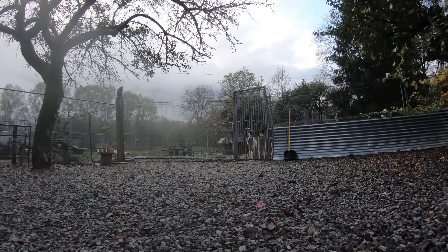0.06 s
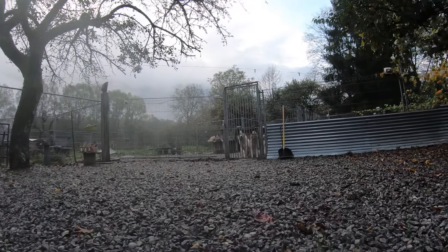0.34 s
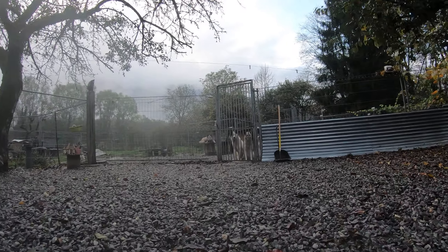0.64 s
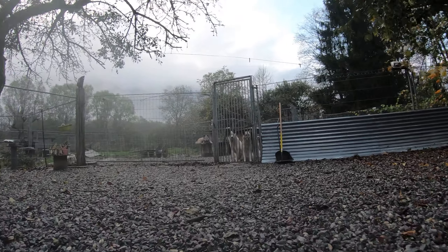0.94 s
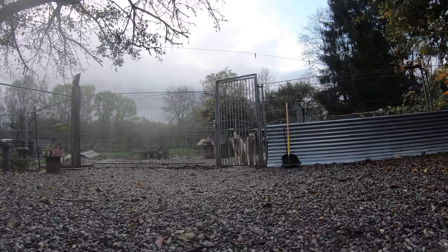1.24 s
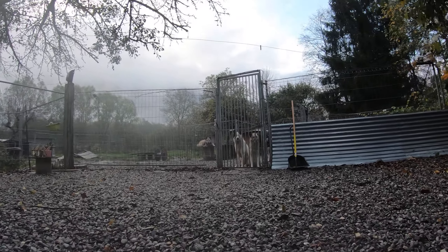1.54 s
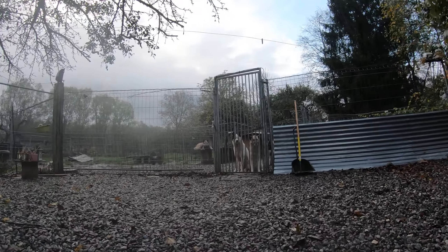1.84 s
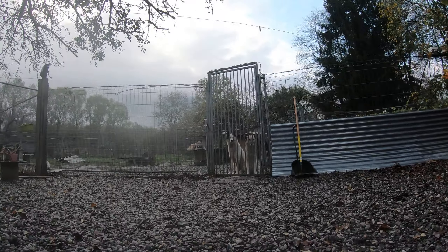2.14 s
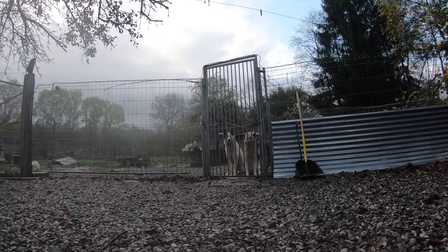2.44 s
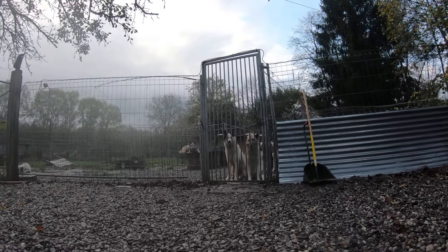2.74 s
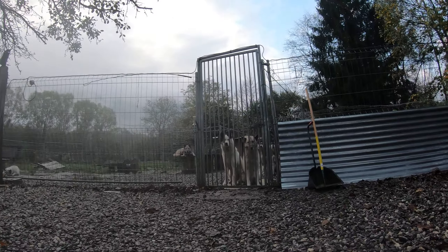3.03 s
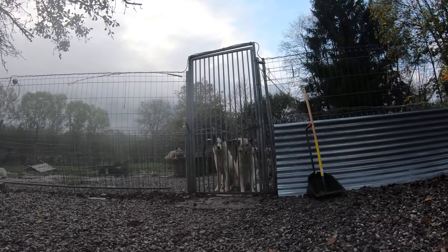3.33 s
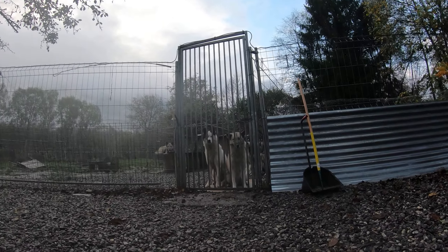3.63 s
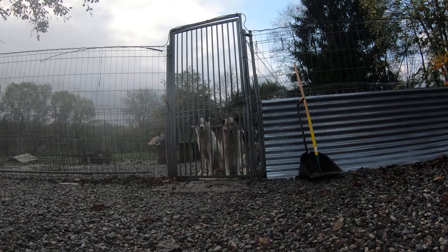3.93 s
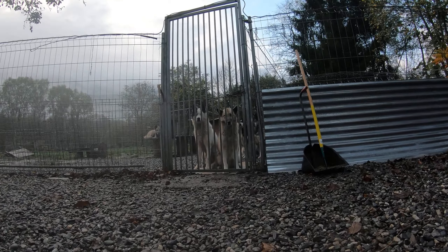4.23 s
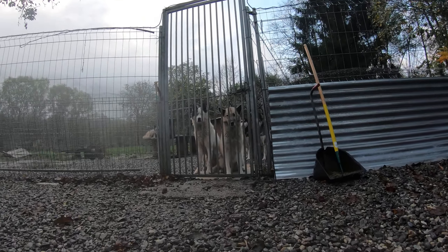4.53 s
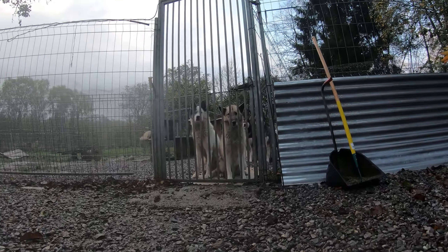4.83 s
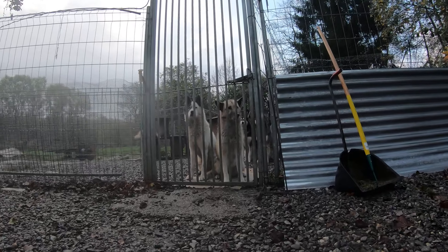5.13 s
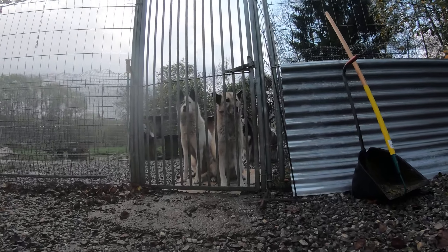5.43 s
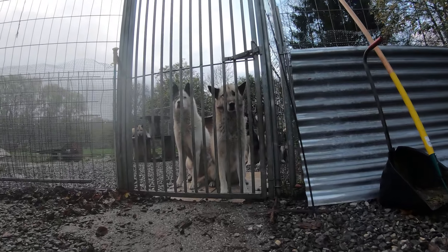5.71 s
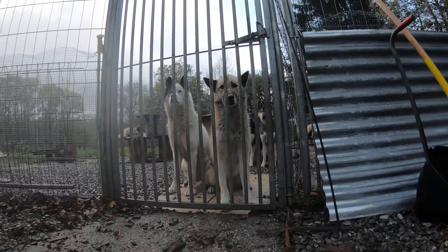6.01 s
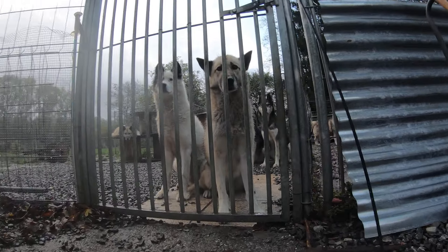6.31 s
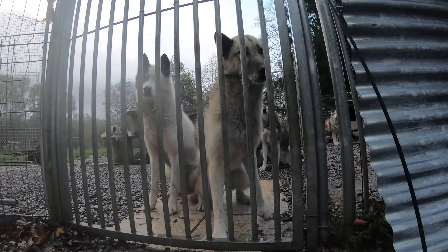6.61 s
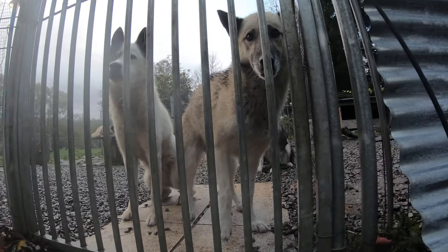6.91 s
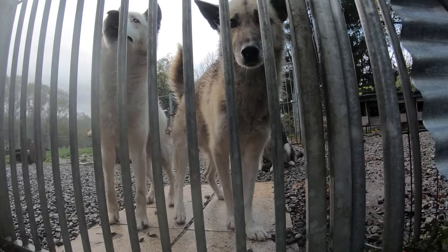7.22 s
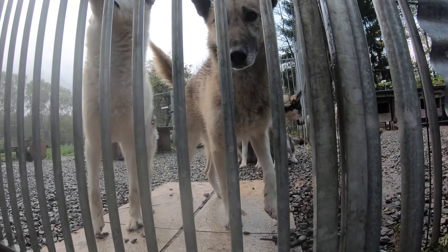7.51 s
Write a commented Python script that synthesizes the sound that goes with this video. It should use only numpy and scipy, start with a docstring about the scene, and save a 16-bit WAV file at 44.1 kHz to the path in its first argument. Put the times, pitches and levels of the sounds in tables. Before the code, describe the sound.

Faint, very high dog whines and a few gusts on a carried microphone open an outdoor walk over gravel. The footsteps crunch close by at an easy pace, heaviest at first, with stones clicking and one sharper click partway through. Toward the end the steps soften, and a quiet dog squeak, a short hollow tap and more brief whines follow, all over a soft hiss and low drone.

```python
"""Footsteps on gravel, dogs at a gate

Someone crosses a yard toward dogs that wait behind a gate. Heel and sole press, hold and release:
friction makes stones slip and collide over a dull thud, and loose pebbles click after them.
The dogs give thin, nearly pure whines and a rough squeak; one hollow tap sounds near the end.
Beneath lie a soft outdoor hiss, a low drone and the rumble of wind on a carried microphone."""
import sys
import numpy as np
from scipy import signal
from scipy.fft import rfft, irfft
from scipy.io import wavfile
from scipy.ndimage import uniform_filter1d

SR = 44100
rng = np.random.default_rng(int(sys.argv[2]) if len(sys.argv) > 2 else 0)


def to_wav(sig):
    """Store sig (one row per channel, or 1-D mono) as 16-bit WAV at the path in sys.argv[1].

    Samples outside -1..1 are clipped; the rate is SR.
    """
    pcm = np.clip(np.atleast_2d(sig), -1, 1) * 32767
    pcm = np.round(pcm).astype(np.int16)
    wavfile.write(sys.argv[1], SR, pcm.T)  # frames by channels


N = 337806

# Levels are relative: each source adds its own gain.
# Each row: time in seconds, then hiss, rustle and drone levels in dB.
BACKGROUND_LEVELS = [(0, -49, -71, -48), (.75, -49, -86, -49), (1.45, -49, -55.5, -48.5),
                     (1.82, -56.5, -61, -50.5), (2.2, -51.5, -56, -48), (2.6, -51.5, -45, -50.5),
                     (3.25, -58.5, -64, -54.5), (3.65, -56, -58, -55.5), (4.4, -56, -57, -52.5),
                     (5.3, -54.5, -51.5, -54), (5.98, -56, -58, -54.5), (6.7, -54, -54.5, -55),
                     (7.15, -54, -50, -51), (7.66, -55, -55, -54)]
# Wind on the microphone, strongest at the outset. Each row: time in seconds, level in dB.
WIND_LEVELS = [(0, -49.5), (.35, -40.5), (.55, -48.5), (.72, -41), (.82, -50.5), (1.3, -58), (2.3, -56),
               (2.7, -65), (3.3, -55.5), (4.15, -54.5), (7.66, -58.5)]
# Spectra of the air, the rumble and the stones. Each row: frequency in Hz, gain in dB.
HISS_SPECTRUM = [(300, 2), (500, -9.5), (750, -6), (950, -10.5), (1400, -7.5), (3200, -11.5), (5000, -17),
                 (8200, -20), (10400, -41.5), (11200, -56.5), (13800, -57), (14800, -70), (16000, -90)]
RUMBLE_SPECTRUM = [(12, 7), (20, -21), (59, 0.5), (76, -4), (114, -13), (168, -7.5), (216, -9), (291, -15),
                   (313, -13), (380, -20.5), (536, -26.5), (586, -15), (700, -12.5), (910, -52),
                   (1540, -120)]
GRAVEL_SPECTRUM = [(60, -20), (110, 1), (190, 1), (300, -3.5), (500, -5.5), (750, -10), (1300, -8.5),
                   (2100, -15), (3300, -11), (5300, -18.5), (7600, -12), (10400, -25), (11300, -33.5),
                   (13800, -36.5), (15800, -55)]
# Each row: start and length in seconds, pitch in Hz, glide in Hz per second, level in dB,
# octave in dB re the fundamental, waver as a fraction of the pitch.
DOG_WHINES = [(.022, 0.072, 4200, 600, -51.5, -36, 0.0052), (0.098, 0.048, 4140, -900, -51, -27, 0.014),
              (0.212, .06, 4150, -900, -51, -41, .014), (2.125, 0.12, 4380, 500, -68, -25, .009),
              (6.763, 0.066, 3460, -3000, -56, 1, 0.037), (7.435, 0.04, 3130, -500, -54, -13, 0.03),
              (7.477, 0.023, 3120, -500, -48.5, -3, 0.054)]
# The loudest pebbles. Each row: start in seconds, level in dB, ring in Hz,
# rattle time constant in seconds, ring in dB re the crack.
PEBBLE_IMPACTS = [(0.107, -22, 524, 0.0031, 29), (0.149, -27, 1560, 0.0023, 20),
                  (0.58, -31, 900, 0.003, 15), (0.665, -31.5, 3000, 0.005, 11),
                  (0.797, -16, 640, 0.0087, 31), (0.822, -20, 576, 0.0028, 10),
                  (1.048, -12, 956, 0.0037, 19), (1.09, -16, 1440, 0.0012, 28),
                  (1.253, -19.5, 514, 0.0065, 37), (1.581, -18, 3640, 0.0038, 8),
                  (1.938, -24.5, 3630, 0.0046, -20), (2.165, -26.5, 1610, 0.0043, 14),
                  (2.193, -30, 2120, 0.0089, 8), (2.263, -28, 6900, 0.0024, 16),
                  (2.403, -15.5, 480, 0.0048, 21), (2.473, -18.5, 540, 0.0075, -23),
                  (2.729, -29.5, 3420, 0.0027, -7), (2.775, -23.5, 3500, 0.0041, 3),
                  (2.971, -7, 6900, 0.0052, 26), (3.094, -26, 7470, 0.0023, 0),
                  (3.774, -30, 6000, 0.0036, 14), (3.823, -24, 4270, 0.0016, 7),
                  (4.675, -21, 1500, 0.0021, 10), (4.712, -14, 7400, 0.0024, 16),
                  (4.754, -14, 2840, 0.003, 6), (4.8, -15.5, 1590, 0.0055, 5),
                  (4.84, -15.5, 1410, 0.0071, 6), (4.851, -19, 1700, 0.0024, 3),
                  (4.923, -22, 1700, 0.0014, 13), (4.946, -22, 2780, 0.0022, 2),
                  (4.966, -21, 1760, 0.0013, 13), (4.995, -23.5, 6860, 0.0039, -5),
                  (5.01, -21.5, 6880, 0.0037, -2), (5.021, -24.5, 2510, 0.0015, 7),
                  (5.053, -29, 5670, 0.0018, 3), (5.108, -28.5, 6470, 0.0014, 6),
                  (5.073, -32.5, 7400, 0.0016, 11), (5.139, -16.5, 6600, 0.0042, 8),
                  (5.452, -35, 8000, 0.002, 8), (5.55, -20.5, 7100, 0.002, -17),
                  (5.611, -14.5, 1660, 0.004, 18), (5.803, -25.5, 3930, 0.004, 8),
                  (5.827, -28, 4180, 0.0076, 9), (6.038, -23, 4050, 0.0014, -1),
                  (6.175, -21, 2280, 0.0045, 13), (6.252, -8.5, 1320, 0.0022, 2),
                  (6.301, -11, 3750, 0.0082, -33), (6.401, -17.5, 3290, 0.0039, -31),
                  (6.451, -23.5, 9200, 0.0011, 7), (6.816, -28, 6400, 0.0029, -28),
                  (7.005, -19, 3660, 0.0046, 18), (7.121, -26, 1740, 0.0017, 3),
                  (7.146, -21, 1070, 0.0071, -3), (7.206, -19, 6840, 0.012, 20),
                  (7.235, -14, 7600, 0.0016, 17), (7.245, -23.5, 7780, 0.0061, 2),
                  (7.27, -21.5, 7700, 0.0044, 2), (7.316, -21, 8550, 0.0046, 15),
                  (7.43, -25.5, 7200, 0.0019, 18), (7.625, -30.5, 1180, 0.0016, 6)]
# A heel or sole loads the gravel. Each row: start, rise and hold in seconds, fade in dB per second,
# crunch level in dB, then offsets in dB for coarse stones, fine grit and weight on the ground.
FOOT_PRESSES = [(0.243, .02, 0.012, 291, -41.5, 7, -22, 7), (0.271, 0.014, .006, 448, -26.5, -9, -17, -5),
                (0.317, 0.018, 0.04, 288, -23, -1.5, -20.5, -0.5),
                (0.438, 0.02, 0.017, 200, -44, -3, -19, 5), (0.842, .03, .02, 200, -47.5, 3, -32, 9.5),
                (.895, 0.0058, 0.033, 302, -24.5, -4, -18, -5),
                (0.927, 0.0075, 0.042, 227, -23.5, -0.5, -22, 3),
                (1.058, 0.016, 0.018, 260, -40.5, -0.5, -18, 4),
                (1.169, .02, 0.025, 152, -48.5, 1.5, -15, 5),
                (1.485, 0.018, 0.044, 148, -49.5, 5.5, -7.5, 9.5),
                (1.567, 0.041, 0.05, 220, -29, -2, -8, 2), (2.257, 0.0074, 0.039, 300, -33, -1, 6.5, -1),
                (2.282, 0.0095, 0.024, 223.5, -29.5, 2, 1, 2.5),
                (2.398, 0.0059, 0.0051, 332, -39.5, 4.5, 3.5, 9),
                (2.868, 0.0081, .018, 295, -29.5, -10, 3.5, -8),
                (2.906, .014, 0.054, 188, -27.5, -2, 1, -0.5),
                (3.815, 0.0096, 0.038, 253, -29.5, -7, 0.5, -7),
                (3.919, 0.055, .022, 222, -37, 0.5, -2.5, 1.5),
                (4.7, 0.013, 0.056, 378, -33.5, -12, 0, -11),
                (4.779, 0.019, .15, 232, -40.5, -3.5, -2.5, -6), (4.83, 0.0067, 0.012, 600, -41.5, 4, 5, 6),
                (5.544, 0.03, 0.015, 380, -30, -2, 3, -2),
                (5.627, 0.012, 0.027, 131, -42, -4.5, -3.5, -2.5),
                (6.032, 0.0051, 0.047, 397, -46, -3.5, -0.5, -3),
                (6.11, 0.011, 0.064, 200, -46, -4.5, -1.5, -3),
                (6.201, .01, 0.0093, 355, -33.5, -8.5, 3.5, -9),
                (6.245, 0.0031, 0.061, 420, -33.5, -1, -2.5, -5.5),
                (6.337, 0.018, 0.059, 260, -43.5, -5, -3.5, -1.5),
                (6.887, 0.017, .01, 228, -36.5, 0.5, 2.5, -1),
                (6.993, 0.028, 0.024, 198, -41, 0.5, -5, 0.5), (7.099, .02, .05, 139, -45.5, -5.5, -3, -8),
                (7.59, 0.02, 0.065, 200, -49.5, 2, -5, -9)]
# Each row: start in seconds, level in dB.
SHOE_THUDS = [(0.369, -29), (0.821, -24), (0.957, -10.5), (0.969, -10), (1.251, -35), (2.122, -33),
              (2.344, -19), (2.404, -25)]
# Each row: start and length in seconds, ring in Hz, level in dB.
STONE_GRINDS = [(0.882, 0.061, 2510, -28.5), (0.931, 0.055, 1190, -29.5), (1.59, 0.11, 2240, -40),
                (2.273, 0.083, 2670, -38.5), (4.834, 0.037, 1450, -36), (5.567, 0.054, 1810, -33)]
# Each row: time in seconds, pitch in Hz, level in dB.
SQUEAK_CONTOUR = [(6.772, 7600, -56), (6.79, 7050, -52), (6.81, 6320, -51), (6.845, 6460, -50),
                  (6.87, 7000, -57), (6.885, 6500, -50)]
# The hollow tap: start in seconds, level in dB.
TAP = (7.0834, -19.5)
# Each row: frequency in Hz, level in dB, time to decay by 60 dB in seconds.
TAP_MODES = [(300, -12, .03), (750, -29, 0.011), (1320, 0.5, 0.017), (1700, 0.5, 0.018), (2800, -24, .006),
             (4300, -11, .004), (5550, -10, 0.0048)]
# Stereo width. Each row: frequency in Hz, side gain in dB.
SIDE_SPECTRUM = [(25, -16), (70, -17.5), (200, -23), (500, -16.5), (1000, -12.5), (4000, -15.5), (6000, -9),
                 (8500, -7), (10000, -6), (12000, -5), (15000, -8)]
# The left port is more sensitive in the high treble. Each row: frequency in Hz, left in dB re right.
PORT_BALANCE = [(700, 0), (1500, -1.2), (5000, -1), (6300, -2.6), (7500, -1), (8200, 4.5), (8800, 6.5),
                (10000, 2), (11000, 3), (15000, 3)]
# The image starts narrow and opens. Each row: time in seconds, side gain in dB.
STEREO_OPENING = [(0, -32), (1.2, -24), (1.65, -11), (2.2, -1), (2.8, 0)]


def amp(db):
    """Decibels to amplitude ratio."""
    return 10 ** (np.asarray(db) / 20)


def unit(x):
    """Normalises to rms 1."""
    return x / np.sqrt(np.mean(x ** 2) + 1e-20)


def spectrum_at(points, hz):
    """Interpolates a spectrum on a log-frequency axis."""
    f, db = np.transpose(points)
    return np.interp(np.log(hz + 1), np.log(np.abs(f) + 1), db)


def level_curve(points, column=1):
    """Interpolates a level column over the whole scene."""
    return np.interp(np.arange(N) / SR, *np.transpose(points)[[0, column]])


def add(mix, s, sound):
    """Superposition: mixes a sound in at s seconds."""
    part = mix[..., max(round(s * SR), 0):][..., :sound.shape[-1]]
    part += sound[..., :part.shape[-1]]


def colour(x, points):
    """Minimum-phase filtering shapes the spectrum and keeps attacks sharp."""
    gain_db = np.maximum(spectrum_at(points, abs(np.fft.fftfreq(4096, 1 / SR))), -100)
    response = np.exp(np.conj(signal.hilbert(np.log(amp(gain_db)))))
    taps = np.fft.ifft(response).real[:2048]
    return signal.oaconvolve(x, np.array(taps, ndmin=x.ndim), axes=-1)[..., :x.shape[-1]]


def band(x, lo_hz, hi_hz, order=4):
    """Band-pass filter."""
    return signal.sosfilt(signal.butter(order, [lo_hz, hi_hz], "band", fs=SR, output="sos"), x)


def drift(size, per_s):
    """Random modulation of rms 1, with per_s turning points a second."""
    knots = rng.standard_normal(4096)
    return unit(np.interp(np.arange(size) * per_s / SR, np.arange(len(knots)), knots))


def steady(x):
    """Division by the running rms evens the level and leaves the grain."""
    power = x[0] ** 2
    return x / np.sqrt(np.abs(uniform_filter1d(power, 1100)) + 1e-4 * power.mean())


def stone_contacts(per_s, spread_db, clump_db, ring_db, sizes=36, decay_cycles=19):
    """Shot noise: each random collision gives a dry crack and the damped ring of one stone size."""
    size = len(per_s)
    t = np.arange(400) / SR
    force = amp(spread_db * np.minimum(rng.exponential(1, size), 4.5) + clump_db * drift(size, 220))
    hits = force * rng.choice([-1, 1], size) * (rng.random(size) < per_s / SR)
    stone = rng.integers(0, sizes, size)
    out = np.zeros((2, size))
    for k, hz in enumerate(np.linspace(700, 15500, sizes)):
        hz += rng.uniform(-250, 250)
        decay = np.exp(-t * (hz / decay_cycles + 330))
        ring = decay * np.sin(2 * np.pi * (hz * t + rng.random((2, 1))))
        crack = rng.standard_normal((2, len(t))) * np.exp(-t / .00021)
        patch_db = rng.uniform(-1, 1.9)  # each patch of gravel has its own mix of sizes
        contact = amp(ring_db + patch_db) * unit(ring) + unit(crack)
        out += signal.oaconvolve((hits * (stone == k))[None], contact, axes=1)[:, :size]
    return out


def diffuse(x, side_db):
    """A diffuse field is wider than a point source, so its side channel is raised."""
    return unit(x) * amp([[0], [side_db]])


def outdoor_hiss():
    """Broadband noise arrives from all around, with a faint rustle of settling gravel."""
    hiss_db, rustle_db = level_curve(BACKGROUND_LEVELS, 1), level_curve(BACKGROUND_LEVELS, 2)
    settling = unit(stone_contacts(np.full(N, 600.), spread_db=3, clump_db=4.5, ring_db=10.5))
    air = colour(rng.standard_normal((2, N)) + .4 * settling, HISS_SPECTRUM)
    air *= amp(1.1 * drift(N, 28))  # the level flutters
    hiss = amp(hiss_db - .5) * diffuse(band(air, 417, 5600), 8)
    rustle = amp(rustle_db - 10.5) * diffuse(band(air, 6590, 14400), 3)
    fizz_gain = np.hypot(amp(hiss_db - 30), amp(rustle_db - 28))
    return hiss + rustle + fizz_gain * diffuse(band(air, 10900, 16000, order=6), 3)


def drone(rumble):
    """Amplitude modulation makes a low band of noise waver."""
    level_db = level_curve(BACKGROUND_LEVELS, 3) + 1.7 * drift(N, 12)
    return amp(level_db) * diffuse(band(rumble, 128, 492), 6)


def buffeting(rumble, gust_db=3.5, jolt_db=-16.5, delay_s=.06, width_s=.038):
    """Wind gusts and the jolt of each press shake the microphone; their powers add."""
    t = np.arange(N) / SR
    gusts = amp(level_curve(WIND_LEVELS) + gust_db * drift(N, 14))
    jolts = sum(amp(db + jolt_db) * np.exp(-((t - s - delay_s) / width_s) ** 2)
                for s, _, _, _, db, *_ in FOOT_PRESSES)
    return np.hypot(gusts, jolts) * diffuse(band(rumble, 11.2, 126, order=3), 6)


def whine(s, length_s, hz, glide_hz_per_s, db, octave_db, waver):
    """A dog's nasal whistle: a fundamental and its second harmonic swell, glide and fade."""
    t = np.arange(0, length_s, 1 / SR)
    pitch = (hz + glide_hz_per_s * (t - length_s / 2)) * (1 + waver * drift(len(t), 450))
    phase = 2 * np.pi * np.cumsum(pitch) / SR
    tone = np.sin(phase) + amp(octave_db) * np.sin(2 * phase)
    swell = np.sin(np.pi * t / length_s) ** .64
    return s, amp(db) * np.sqrt(2) * tone * swell


def pebble(s, db, hz, rattle_s, ring_db):
    """Impact excitation: a crack and a brief rattle drive the stone's resonance."""
    t = np.arange(2600) / SR
    decay = .55 * np.exp(-t / rattle_s) + np.exp(-t / .0004) + .03 * np.exp(-t / .009)
    crack = colour(rng.choice([-1, 1], (2, len(t))) * decay, GRAVEL_SPECTRUM)
    crack = band(crack, .21 * hz + 200, 15500, order=2)
    ring = band(crack, hz / 1.3, hz * 1.3 + 500, order=1)
    return s, amp(db - 25.5) * unit(unit(crack) + amp(ring_db) * unit(ring))


def footfall(s, rise_s, hold_s, fade_db_per_s, level_db, coarse_db, grit_db, weight_db, length_s=.55):
    """Granular friction: the greater the load, the more stones slip; big ones sound low, grit high."""
    t = np.arange(0, length_s, 1 / SR)
    released_s = np.maximum(t - rise_s - hold_s, 0)
    settling = amp(-26.5 - 53.5 * released_s)  # stones keep shifting after the foot stops
    press = np.clip(t / rise_s, .01, 1) * np.hypot(amp(-fade_db_per_s * released_s), settling)
    crunch_db = level_db + 20 * np.log10(press)
    contacts_per_s = 3500 * amp(.62 * (crunch_db + 31.5))
    stones = unit(stone_contacts(contacts_per_s, spread_db=2.7, clump_db=1, ring_db=-2.5))
    stones = colour(stones + .18 * rng.standard_normal(stones.shape), GRAVEL_SPECTRUM)
    lag_db = -4 * np.exp(-t / .09)  # ground and big stones come in after the first grit
    ground = amp(weight_db + lag_db - 1.14) * steady(band(stones, 163, 386, order=2))
    coarse = amp(coarse_db + .5 * lag_db - 2.2) * steady(band(stones, 594, 1920))
    middle = amp(-3.02) * steady(band(stones, 2060, 5110))
    grit = amp(grit_db - .5) * steady(band(stones, 5130, 10900))
    dust = amp(.21 * grit_db - 23.5) * steady(band(stones, 11370, 15200))
    fade_out = np.minimum(10 * (1 - t / length_s), 1)
    return s, amp(crunch_db) * (ground + coarse + middle + grit + dust) * fade_out


def stray_pebbles(per_press=2, mean_flight_s=.17, lo_hz=1500, hi_hz=7000):
    """Rows for kicked pebbles, delayed by their time of flight; gritty ground throws brighter ones."""
    rows = []
    for s, *_, grit_db, _ in FOOT_PRESSES:
        for flight, size, tone in rng.random((per_press, 3)):
            hz = lo_hz * (hi_hz / lo_hz) ** (tone * amp(min(grit_db, 0)))
            rows.append((s + mean_flight_s * (.5 + flight), size - 39.5, hz, .0022, 6))
    return rows


def thud(s, db, hz=245, t60=.018):
    """Heavy damping: packed ground answers the shoe with a few low cycles."""
    t = np.arange(4000) / SR
    push = np.sin(2 * np.pi * hz * t) * amp(-60 * t / t60)
    knock = band(push, 155, 670, order=2)
    return s, amp(db - 1.5) * knock / abs(knock).max()


def grind(s, length_s, hz, db):
    """Stick-slip friction keeps one large stone ringing in a narrow band."""
    size = int(length_s * SR)
    ring = band(rng.standard_normal(size), .9 * hz, 1.1 * hz, order=2)
    return s, amp(db) * unit(ring) * signal.windows.tukey(size, .5)


def squeak(jitter=.0315, detune=.99):
    """A dog's squeak: random frequency modulation roughens two whistles that slide together."""
    s, hz, db = np.transpose(SQUEAK_CONTOUR)
    t = np.arange(s[0], s[-1], 1 / SR)
    pitch = np.interp(t, s, hz)
    phases = [2 * np.pi * np.cumsum(pitch * (1 + jitter * drift(len(t), 910))) / SR for _ in range(2)]
    tone = .99 * np.sin(phases[0]) + .5 * np.sin(detune * phases[1])
    return s[0], amp(np.interp(t, s, db)) * tone * signal.windows.tukey(len(t), .15)


def hollow_tap():
    """Free vibration: a hollow body, struck once, rings in decaying modes."""
    s, level_db = TAP
    t = np.arange(2000) / SR
    ring = sum(amp(db - 60 * t / t60) * np.sin(2 * np.pi * hz * t) for hz, db, t60 in TAP_MODES)
    return s, amp(level_db + .5) * ring


def echoes(x, wet_db=-23, t60=.3, per_s=2000):
    """Scattering from ground, fence and trees adds faint reflections."""
    t = np.arange(SR // 4) / SR
    taps = rng.standard_normal((2, len(t))) * (rng.random((2, len(t))) < per_s / SR)
    taps *= amp(-60 * t / t60) * (t > .004)
    return x + amp(wet_db) * signal.oaconvolve(x, taps / np.linalg.norm(taps[0]), axes=1)[:, :N]


def microphone_ports(mid, side):
    """Sum and difference give left and right; two close ports differ mostly in the treble."""
    hz = np.fft.rfftfreq(N, 1 / SR)
    balance = amp(spectrum_at(PORT_BALANCE, hz))
    difference = rfft(colour(side, SIDE_SPECTRUM)) + rfft(mid) * (balance - 1) / (balance + 1)
    fizz = irfft(difference * np.clip((hz - 10500) / 1500, 0, 1), N)  # wide from the start
    side = fizz + (irfft(difference, N) - fizz) * amp(level_curve(STEREO_OPENING))
    return np.array([mid + side, mid - side])


def scene():
    """All sources superpose as mid and side, then reach the microphone."""
    mix = np.zeros((2, N))
    for row in FOOT_PRESSES:
        add(mix, *footfall(*row))
    for row in list(PEBBLE_IMPACTS) + stray_pebbles():
        add(mix, *pebble(*row))
    shoe = [thud(*row) for row in SHOE_THUDS] + [grind(*row) for row in STONE_GRINDS]
    dogs = [whine(*row) for row in DOG_WHINES] + [squeak()]
    for s, sound in shoe + dogs + [hollow_tap()]:
        add(mix[0], s, sound)
    mix = echoes(mix) + outdoor_hiss()
    rumble = colour(rng.standard_normal((2, N)), RUMBLE_SPECTRUM)
    return microphone_ports(*(mix + drone(rumble) + buffeting(rumble)))


def record(dry, cutoff_hz=15900):
    """Band limiting: a linear-phase low-pass removes the highest treble."""
    taps = signal.firwin(511, cutoff_hz, window=("kaiser", 9), fs=SR)
    return signal.oaconvolve(dry, taps[None], "same")


dry = scene()
out = record(dry)
to_wav(out)
```